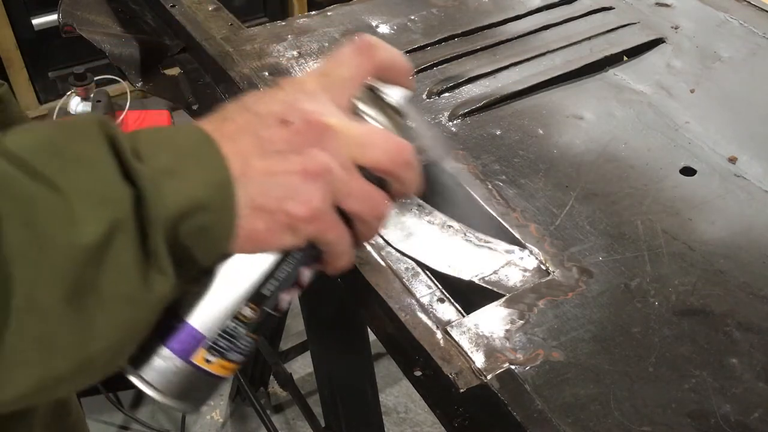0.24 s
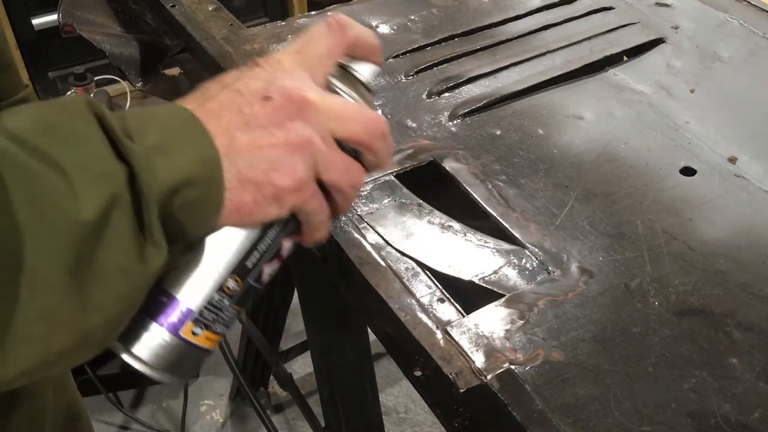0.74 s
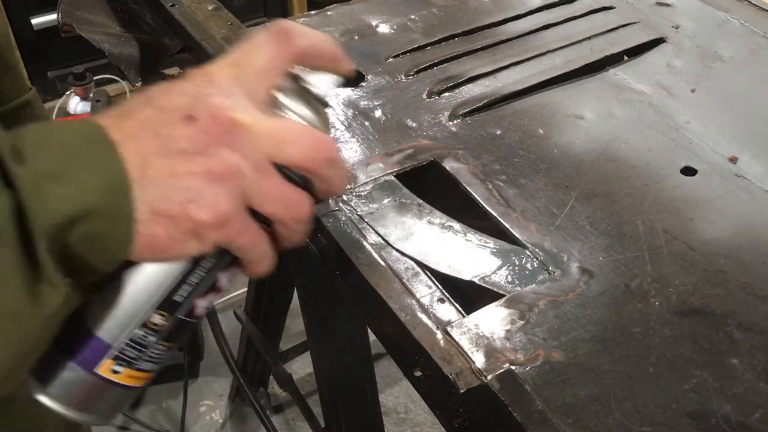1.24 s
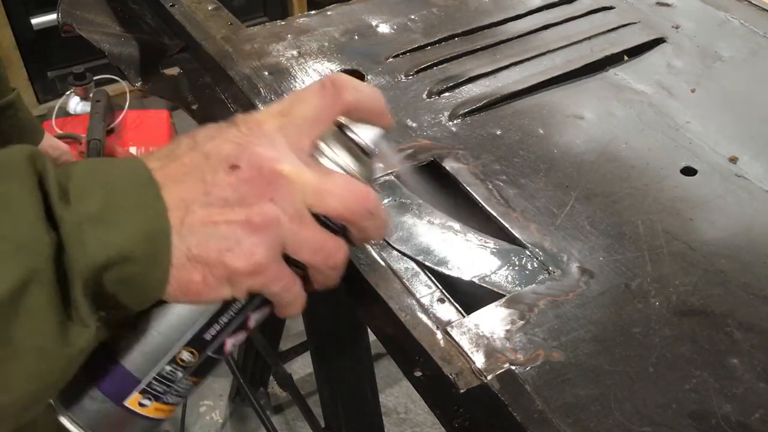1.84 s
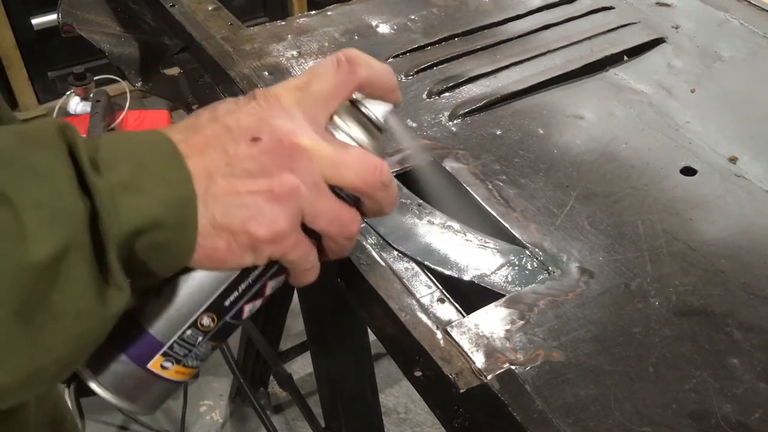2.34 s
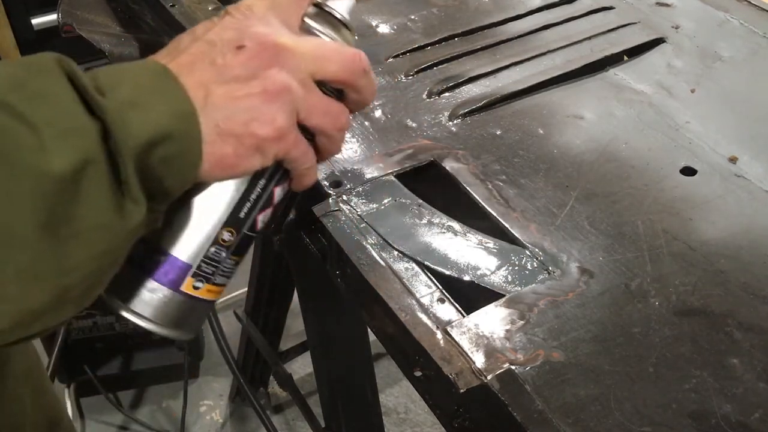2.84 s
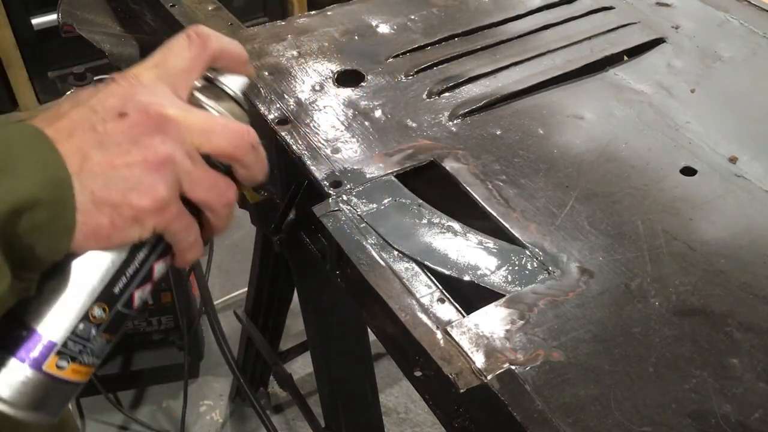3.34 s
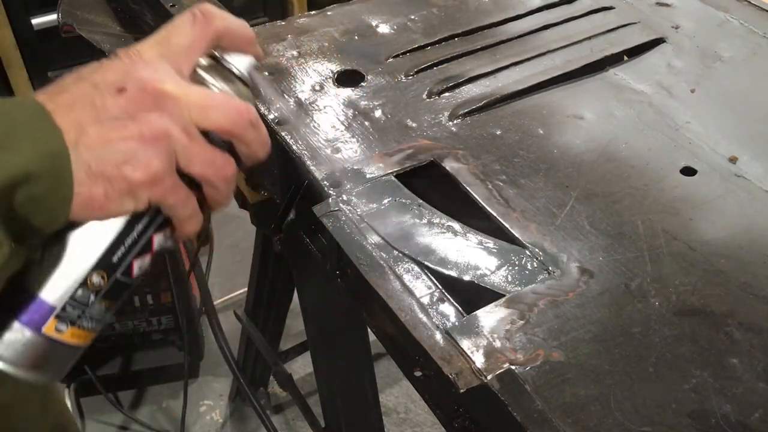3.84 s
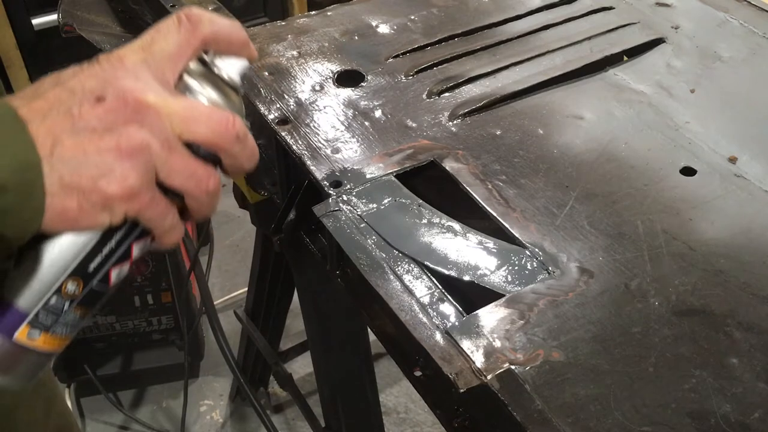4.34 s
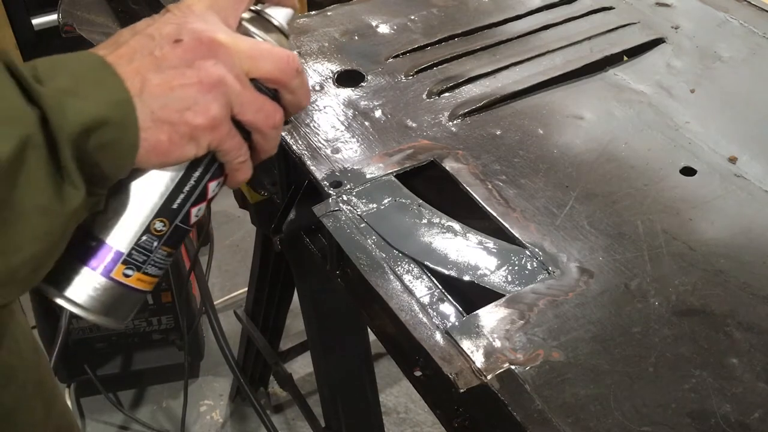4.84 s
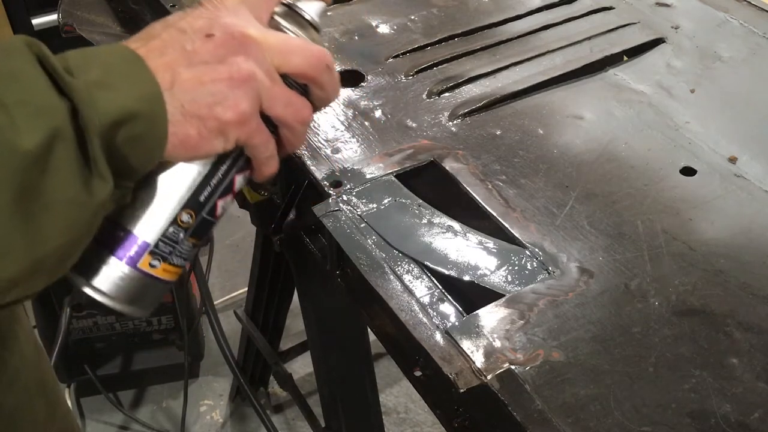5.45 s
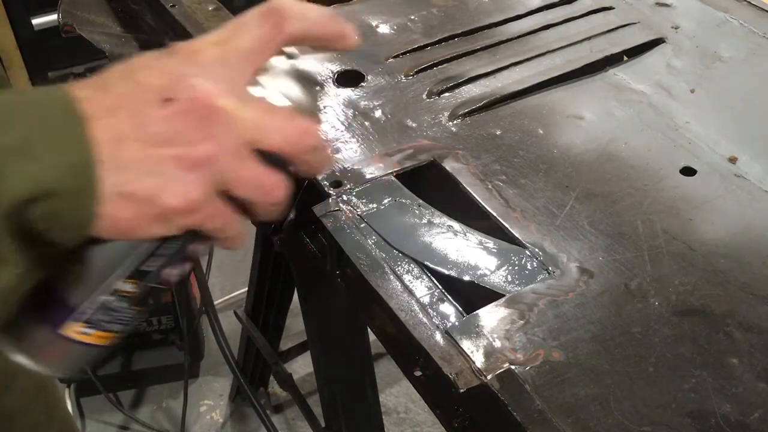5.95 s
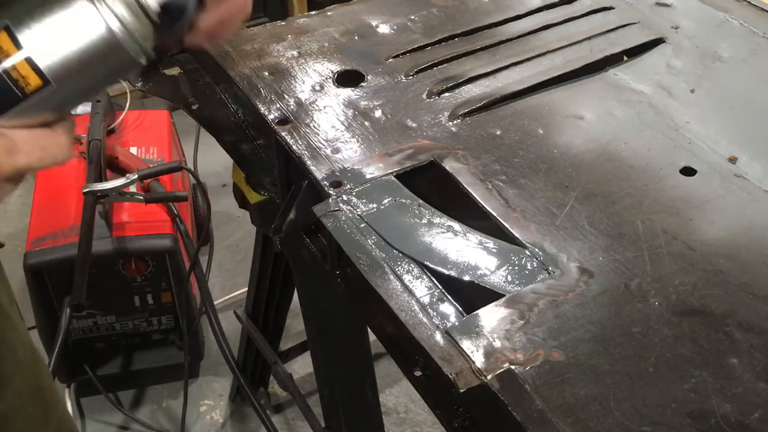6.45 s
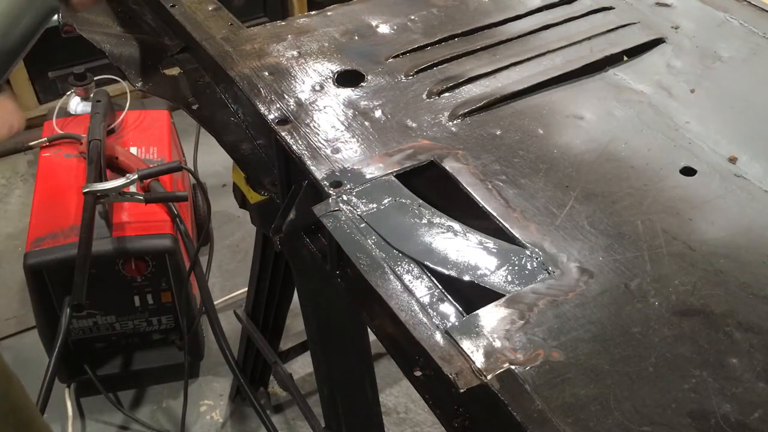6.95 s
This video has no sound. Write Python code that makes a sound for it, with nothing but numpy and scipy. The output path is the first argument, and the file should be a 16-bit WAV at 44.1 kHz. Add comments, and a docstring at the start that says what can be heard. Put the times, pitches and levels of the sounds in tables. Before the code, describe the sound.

An aerosol can sprays paint on metal in eight hissing bursts, then a sharp snap and the can is set down.

```python
"""An aerosol can sprays paint on a bare steel panel in eight bursts, close by in a small workshop.
Gas rushing through the nozzle hisses, and the jet pushes on the sheet so that it rumbles softly.
Between bursts the mixing ball taps faintly inside the can. Afterwards there is one sharp snap,
a sleeve swishes as the arm pulls back, and the can is set down with a few hollow knocks."""
import sys
import numpy as np
from scipy import signal
from scipy.fft import rfft, irfft, next_fast_len
from scipy.io import wavfile

SR = 44100
rng = np.random.default_rng(int(sys.argv[2]) if len(sys.argv) > 2 else 0)


def waveform_to_disk(signal):
    """Save audio, clipped to [-1, 1], as 16-bit WAV at the path in sys.argv[1]."""
    frames = np.transpose(np.atleast_2d(signal))
    scaled = np.clip(frames, -1, 1) * 32767
    samples = np.round(scaled).astype(np.int16)
    wavfile.write(sys.argv[1], SR, samples)


N = 317243
TIME = np.arange(N) / SR
FFT_SIZE = 2 * next_fast_len(N // 2 + 1)
HZ = np.fft.rfftfreq(FFT_SIZE, 1 / SR)

# Each press of the nozzle: start_s, end_s, opening_s, closing_s, echo_at_start_ms, echo_at_end_ms,
# hiss_db, sizzle_db, fizz_db, rumble_db
BURSTS = [(0.054, 0.547, 0.038, 0.065, 0.76, 0.87, -22.5, 1.2, 3.5, -50.5),
          (0.819, 1.227, 0.06, 0.058, 0.79, 0.88, -23.5, 1.3, 2, -53.5),
          (1.468, 1.683, 0.034, 0.077, 0.9, 0.86, -23, -0.5, 4, -50.5),
          (1.884, 2.101, 0.025, 0.06, 0.9, 0.86, -22, -2.6, 3.4, -51.5),
          (2.372, 2.786, 0.028, 0.072, 0.91, 0.84, -23.5, 2.5, 3.5, -56.5),
          (3.426, 3.977, 0.04, 0.063, 0.94, 1.14, -21.5, -2.5, 3, -49.5),
          (5.085, 5.291, 0.055, 0.066, 0.72, 0.85, -24.5, 3, 1, -54),
          (5.661, 5.832, 0.046, 0.065, 0.89, 1, -23, 1.2, 1.5, -53)]


def amp(db):
    """Turns decibels into a gain."""
    return 10 ** (np.asarray(db) / 20)


def fade(t, fade_s):
    """A gain that falls by 60 dB every fade_s seconds."""
    return amp(-60 * t / fade_s)


def unit(x):
    """Scales a signal to an average (rms) level of 1."""
    return x / np.sqrt(np.mean(x ** 2) + 1e-20)


def curve(points, hz=HZ):
    """Joins (pitch_hz, value) points with straight lines on an octave scale."""
    pitch_hz, value = np.transpose(points)
    return np.interp(np.log(hz + 1), np.log(pitch_hz), value)


def bumps(rows):
    """Bell-shaped peaks or dips in a spectrum, in dB."""
    return sum(db * np.exp(-2 * ((HZ - hz) / width) ** 2) for hz, width, db in rows)


def band(hz, centre_hz, octaves):
    """A gain that keeps only the pitches near centre_hz."""
    return 1 / (1 + (np.log2((hz + 1) / centre_hz) / octaves) ** 4)


def noise(colour_db):
    """Steady noise with the given colour (its level at each pitch)."""
    return unit(irfft(rfft(rng.standard_normal(FFT_SIZE)) * amp(colour_db))[:N])


def wander(rate_hz):
    """A smooth random wobble, up to about the given rate."""
    return unit(irfft(rfft(rng.standard_normal(FFT_SIZE)) * np.exp(-(HZ / rate_hz) ** 2))[:N])


def impulse(colour_db):
    """The shortest click that has the given colour."""
    log_gain = np.log(amp(colour_db))
    mirrored = np.concatenate([log_gain, log_gain[-2:0:-1]])
    return np.fft.ifft(np.exp(np.conj(signal.hilbert(mirrored)))).real[:2048]


def add(mix, start_s, sound):
    """Mixes a sound in at start_s."""
    part = mix[round(start_s * SR):][:len(sound)]
    part += sound[:len(part)]


def ring(tones, pitch=1):
    """The fading tones of an object struck once."""
    t = np.arange(SR // 2) / SR
    return sum(amp(db) * fade(t, fade_s) * np.sin(2 * np.pi * hz * pitch * t) for hz, db, fade_s in tones)


def swells(rows):
    """The loudness of smooth movements that speed up and slow down again."""
    return np.sqrt(sum((amp(db) * np.exp(-((TIME - s) / half_s) ** 2)) ** 2 for s, db, half_s in rows))


def background(level_db=-55.5):
    """The workshop's faint, steady rumble."""
    # Its colour: pitch_hz, level_db
    air = [(25, -20.5), (40, -7), (55, -0.5), (78, 0), (115, -9.5), (180, -9.5), (230, -16), (320, -25),
           (600, -30.5), (1500, -34.5), (2400, -35), (5000, -39), (7000, -36), (15800, -39.5)]
    return amp(level_db) * noise(curve(air))


def room_echo(sound, first_echo_s=0.0054, sweep_hz=3):
    """Dense echoes of a small room; three patterns blend in turn, as if the can were moving."""
    # How long the room rings: pitch_hz, fade_s
    room = [(150, 0.25), (900, 0.21), (4000, 0.29), (9000, 0.22), (15000, 0.14)]
    out = np.zeros(N)
    for third in np.arange(3) / 3:
        echoes = rng.standard_normal(SR // 2) * (np.arange(SR // 2) > first_echo_s * SR)
        hz, t, spectrum = signal.stft(echoes, SR, nperseg=256)
        tail = signal.istft(spectrum * fade(t, curve(room, hz)[:, None]), SR)[1]
        share = np.sqrt(2 / 3) * np.cos(np.pi * (sweep_hz * TIME + third))
        out += signal.fftconvolve(sound * share, tail / np.linalg.norm(tail))[:N]
    return out


def sleeve(grain_db=1.5, rest_db=-79):
    """Cloth slides on cloth: a soft, grainy swish with each arm movement, and a trace in between."""
    # Colour of rubbing cloth: pitch_hz, level_db
    cloth = [(150, -10), (600, -4), (1500, -8.5), (3000, -5), (4800, -8.5), (6200, -1), (9200, -4.5),
             (11000, -6), (15500, -7)]
    # Arm movements: fastest_s, level_db, half_length_s
    strokes = [(.02, -65, 0.09), (.77, -65.5, 0.035), (2.3, -68, 0.12), (4.42, -70.5, 0.033),
               (6.14, -58.5, 0.22), (6.32, -52, 0.096), (6.43, -52.5, 0.084), (6.635, -50.5, 0.071),
               (6.8, -49, 0.069), (7.0, -54, 0.033), (7.15, -50.5, 0.089)]
    movement = np.hypot(amp(rest_db), swells(strokes))
    return noise(curve(cloth)) * movement * amp(grain_db * wander(700))


def ticks():
    """Fingers and can touch lightly, each click a quickly fading puff of noise."""
    # Touches: start_s, level_db, pitch_hz, width_octaves, fade_s
    touches = [(2.273, -56, 6900, 0.66, 0.055), (2.341, -44.5, 9900, 0.67, 0.013),
               (2.880, -47, 13000, 0.55, .02), (3.041, -60.5, 8000, .8, .04),
               (3.319, -61.5, 5000, 0.9, 0.078), (3.385, -65, 1390, 0.53, 0.18),
               (4.396, -63.5, 1400, 0.58, .12), (4.577, -43.5, 10050, 0.75, 0.015),
               (5.394, -65, 1500, 0.94, 0.28), (6.548, -32.5, 5850, 0.89, 0.015),
               (6.595, -55, 4220, 0.33, 0.19), (6.648, -36, 7000, 1.1, 0.039),
               (6.657, -36.5, 4970, 4.5, 0.054), (6.944, -55.5, 2500, 1.5, .05),
               (7.061, -44, 8000, 2.1, 0.066), (7.071, -38, 3900, 1.4, 0.025),
               (7.146, -50.5, 1500, 1.5, 0.15)]
    out, t = np.zeros(N), np.arange(SR // 4) / SR
    hz = np.fft.rfftfreq(len(t), 1 / SR)
    for start_s, db, pitch_hz, octaves, fade_s in touches:
        spectrum = rfft(rng.standard_normal(len(t))) * band(hz, pitch_hz, octaves)
        puff = unit(irfft(spectrum, len(t)))
        add(out, start_s, amp(db) * puff * fade(t, fade_s))
    return out


def mixing_ball(chatter=0.13, chatter_fade_s=0.023):
    """The mixing ball hits the wall as the can tilts, and chatters briefly against it."""
    # Taps of the ball: start_s, level_db, pitch_factor
    taps = [(.654, -54.5, 1.07), (.752, -62, 1), (2.208, -60, 0.97), (2.281, -60, 0.99), (3.185, -63.5, 1),
            (3.336, -63, 1.03), (4.152, -46.5, 1.03), (4.348, -57, 0.99), (4.412, -57.5, 1.1),
            (4.906, -58.5, 1.04), (5.542, -66, 1)]
    # Tones of the wall, damped by the paint: pitch_hz, level_db, fade_s
    wall = [(1610, -23, 0.0082), (2250, -2.5, 0.028), (2520, -3.5, 0.036), (2920, -3.5, 0.021),
            (3950, -1, 0.0079), (4490, -5.5, 0.016), (5570, -3, .012), (8420, -5, .007)]
    out, t = np.zeros(N), np.arange(SR // 10) / SR
    for start_s, db, pitch in taps:
        blow = (t == 0) + chatter * rng.standard_normal(len(t)) * fade(t, chatter_fade_s)
        add(out, start_s, amp(db) * signal.fftconvolve(blow / np.linalg.norm(blow), ring(wall, pitch)))
    return out


def snap(start_s=6.1534, level_db=6, smear_s=0.000755):
    """One hard snap, scattered by the can and the metal around it."""
    # Its colour: pitch_hz, level_db
    colour = [(100, -27), (500, -19), (1100, -13), (2300, -13.5), (2900, -17), (3700, -20), (4300, -11),
              (5400, -13.5), (6500, -5), (9500, -1), (11300, -1.5), (13000, -10), (16000, -10)]
    out, t = np.zeros(N), np.arange(SR // 4) / SR
    scatter = amp(-28) * fade(t, fade_s=0.033) + amp(-44) * fade(t, fade_s=0.07)
    blow = (t == 0) + scatter * rng.standard_normal(len(t))
    spectrum = rfft(impulse(curve(colour)), FFT_SIZE)
    # in thin metal the high pitches travel faster, so the lows arrive a little later
    delay_s = smear_s * (1 - HZ / HZ[-1]) ** 2
    crack = irfft(spectrum * np.exp(-2j * np.pi * np.cumsum(delay_s) * HZ[1]))[:len(t)]
    add(out, start_s, amp(level_db) * signal.fftconvolve(blow, unit(crack) / np.sqrt(len(t))))
    return out


def can_set_down(contact_s=0.00095, judder_db=3):
    """The can lands on its rim, rocks lower in pitch and slides a little; the hand bumps the bench."""
    # The can touching down: start_s, level_db, pitch_factor
    knocks = [(6.5478, -23.5, 0.96), (6.6402, -43, 1), (6.6485, -27, .92), (6.6582, -25.5, .86),
              (6.6645, -33, 0.7)]
    # Its hollow tones: pitch_hz, level_db, fade_s
    can = [(933, 1.5, 0.035), (1024, -9, 0.054), (538, -10.5, 0.04), (1500, -14.5, 0.017),
           (1010, -28, 0.36), (3430, -31, 0.059), (4150, -24, 0.053)]
    # Dull bumps of the hand: start_s, level_db, pitch_hz, fade_s
    thumps = [(7.072, -28, 233, 0.017), (7.144, -37, 162, 0.03)]
    # The base sliding: fastest_s, level_db, half_length_s
    slides = [(6.72, -60, 0.033), (6.94, -60.5, .055), (7.07, -60, 0.027)]
    out, t = np.zeros(N), np.arange(SR // 2) / SR
    soft_start = 1 - np.exp(-t / contact_s)
    for start_s, db, pitch in knocks:
        add(out, start_s, amp(db) * ring(can, pitch) * soft_start)
    for start_s, db, pitch_hz, fade_s in thumps:
        add(out, start_s, ring([(pitch_hz, db, fade_s)]) * soft_start)
    rub = noise(20 * np.log10(band(HZ, centre_hz=720, octaves=0.46)))
    return out + rub * swells(slides) * amp(judder_db * wander(100))


def burst_at(t):
    """For the burst nearest each time: held_s, hiss_db, sizzle_db, fizz_db, rumble_db."""
    bursts = np.array(BURSTS)
    mid_pauses_s = (bursts[:-1, 1] + bursts[1:, 0]) / 2
    nearest = bursts[np.searchsorted(mid_pauses_s, t)]
    return np.maximum(t - nearest[:, 0], 0), *nearest[:, 6:].T


def valve_flow(lag_s=0, leak=0.128, unseal_s=0.0048):
    """Flow from 0 to 1: each time the seal first leaks, then the finger presses fully and lets go."""
    flow, t = np.zeros(N), TIME - lag_s
    for start_s, end_s, opening_s, closing_s, *_ in BURSTS:
        unsealed = np.clip((t - start_s) / unseal_s, 0, 1)
        pressed = np.sin(np.clip((t - start_s) / opening_s, 0, 1) * np.pi / 2) ** 2
        release = np.sin(np.clip((end_s - t) / closing_s, 0, 1) * np.pi / 2) ** 2
        flow += (leak * unsealed + (1 - leak) * pressed) * release
    return flow


def panel_rumble(level_db=-1, lump_db=1.5, half_crossing_s=0.037, hum_db=-5, hum_fade_s=0.93):
    """The jet shakes the panel with a lumpy rumble, most at its edges; the loose sheet hums on."""
    # Colour of the jet hitting the panel: pitch_hz, level_db
    gust = [(30, -40), (80, -1), (130, -9), (185, 2), (250, -6.5), (320, -9.5), (410, -20.5), (900, -26),
            (3000, -91)]
    # The jet crossing an edge of the sheet: middle_s, level_db
    crossings = [(.18, -47.5), (.35, -39.5), (.89, -44.5), (1.045, -45), (1.544, -39.5), (1.946, -39),
                 (2.485, -45), (3.66, -47), (3.84, -47.5), (5.221, -55), (5.73, -46.5)]
    *_, rumble_db = burst_at(TIME)
    edges = swells([(middle_s, db, half_crossing_s) for middle_s, db in crossings])
    push = valve_flow(lag_s=0.016) * np.hypot(amp(rumble_db), edges)
    rumble = push * noise(curve(gust)) * amp(level_db + lump_db * wander(14))
    sheet = rng.standard_normal(SR) * fade(np.arange(SR) / SR, hum_fade_s)
    hum = signal.fftconvolve(rumble, sheet / np.linalg.norm(sheet))[:N]
    return rumble + amp(hum_db) * hum


def nozzle_hiss(level_db=-0.38, sag_db_per_s=6.5, flutter_db=0.24, sputter_db=1, echo_db=1):
    """Gas swirls out of the nozzle and hisses, coloured by the can's aim and by shifting echoes."""
    # Colour of the hiss: pitch_hz, level_db
    colour = [(100, -35.5), (450, -22.5), (1700, -22), (2900, -21), (3900, -17.5), (5100, -17.5),
              (5950, -9), (7000, -8), (8200, -9), (9100, -4), (11000, -3), (12300, 0), (13900, -5.5),
              (15400, -3.5)]
    # Resonance of the nozzle cap: pitch_hz, width_hz, level_db
    cap = [(2425, 160, 7.5), (2223, 550, 4.5), (2720, 140, -3)]
    # Echoes off the panel, hand and bench: delay_factor, gain
    echoes = [(1, .16), (1.7, .14), (2.9, -.13), (4.3, .13), (6.1, -.12)]
    hz, t, spectrum = signal.stft(noise(curve(colour) + bumps(cap)), SR, nperseg=1024, noverlap=768)
    hz, bursts = hz[:, None], np.array(BURSTS)
    held_s, hiss_db, sizzle_db, fizz_db, _ = burst_at(t)
    # the treble beams forward, so the aim sets the balance of three bands
    mids = 1 / (1 + (hz / 8000) ** 8)
    sizzle = np.exp(-((hz - 12250) / 900) ** 2)
    fizz = 1 - 1 / (1 + (hz / 13500) ** 40)
    aim_db = (0.31 * sizzle_db - 0.5) * mids + sizzle_db * sizzle + fizz_db * fizz
    # while the valve is held the can chills and loses pressure, so the hiss sags
    pressure_db = hiss_db - sag_db_per_s * held_s
    # echoes boost some pitches and cancel others; the pattern glides as the can sweeps
    delay_s = np.interp(t, bursts[:, :2].ravel(), bursts[:, 4:6].ravel()) / 1000
    reflected = sum(gain * np.exp(-2j * np.pi * hz * delay_s * factor) for factor, gain in echoes)
    spectrum *= amp(aim_db + pressure_db) * abs(1 + amp(echo_db) * reflected)
    jet = signal.istft(spectrum, SR, nperseg=1024, noverlap=768)[1][:N]
    # paint leaves the nozzle in uneven spurts
    uneven_db = flutter_db * wander(40) + sputter_db * wander(900)
    return jet * valve_flow() * amp(level_db + uneven_db)


def scene(spray_room_db=-10, handling_room_db=-12):
    """Spray and handling in the room, over its low rumble; both channels alike."""
    spray = nozzle_hiss() + panel_rumble()
    handling = sleeve() + ticks() + mixing_ball() + snap() + can_set_down()
    room = room_echo(amp(spray_room_db) * spray + amp(handling_room_db) * handling)
    mono = spray + handling + room + background()
    return np.array([mono, mono])


def record(dry, cutoff_hz=15740):
    """The microphone's opening puts dips in the treble, and the very highest pitches are cut off."""
    # The dips: pitch_hz, width_hz, level_db
    dips = [(7580, 420, -3), (10430, 450, -4), (13530, 840, -0.5)]
    coloured = signal.oaconvolve(dry, impulse(bumps(dips))[None], axes=1)[:, :N]
    low_pass = signal.firwin(801, cutoff_hz, window=("kaiser", 8), fs=SR)
    return signal.oaconvolve(coloured, low_pass[None], "same")


dry = scene()
out = record(dry)
waveform_to_disk(out)
```